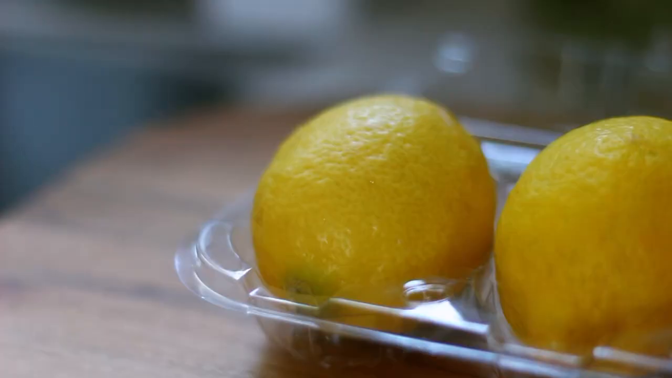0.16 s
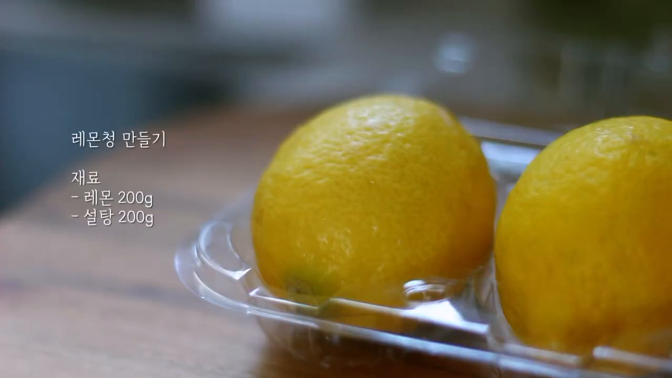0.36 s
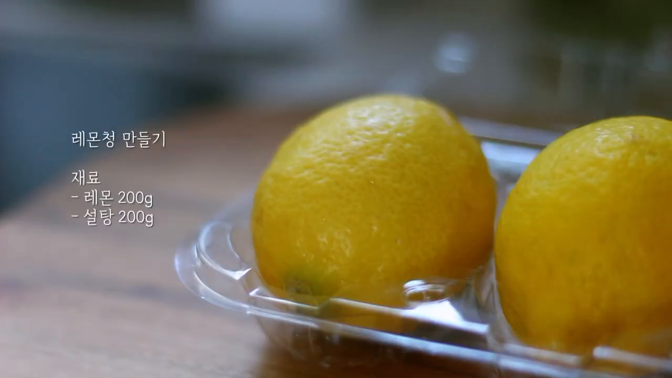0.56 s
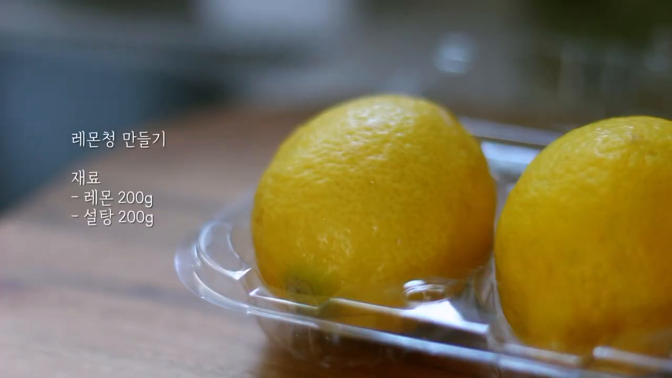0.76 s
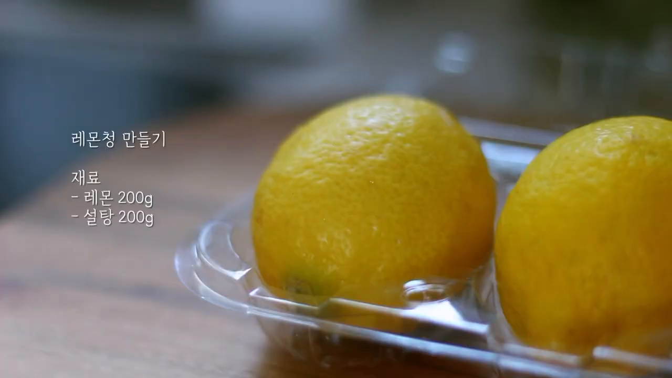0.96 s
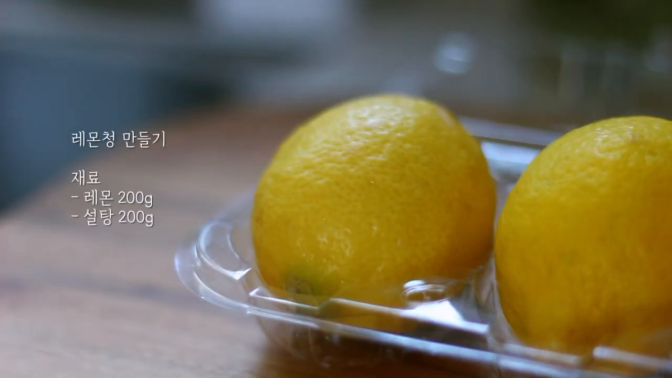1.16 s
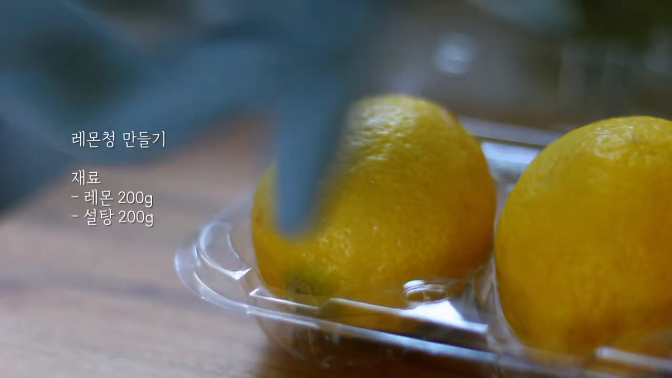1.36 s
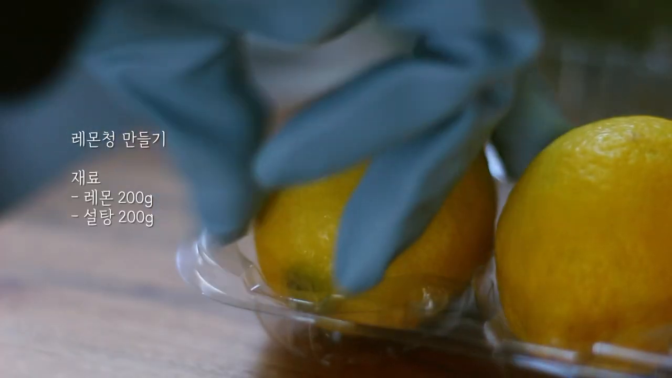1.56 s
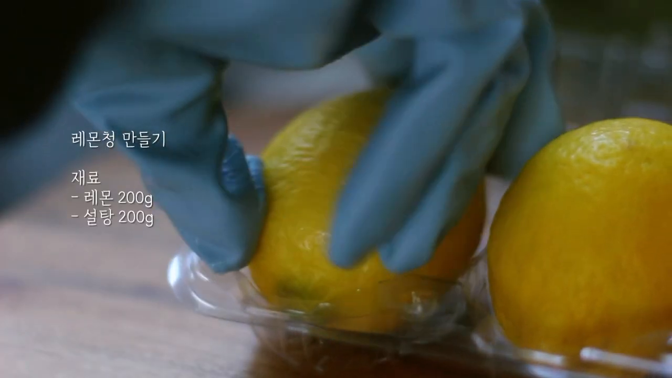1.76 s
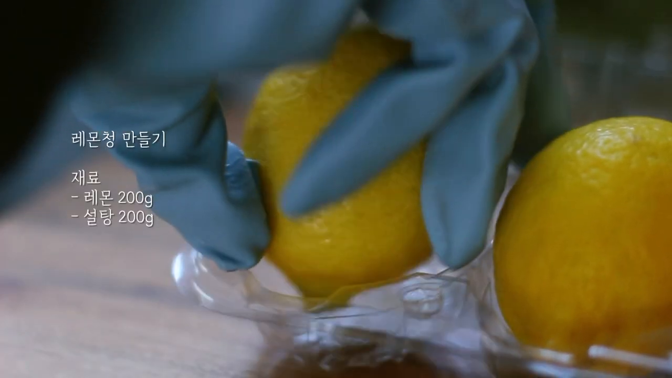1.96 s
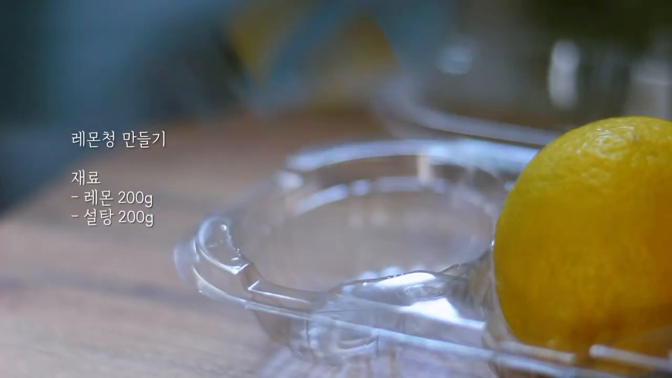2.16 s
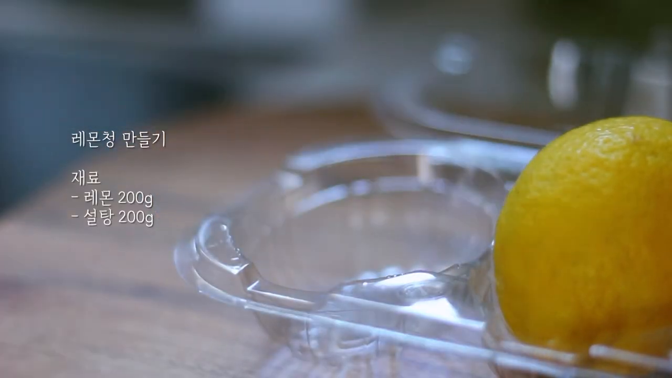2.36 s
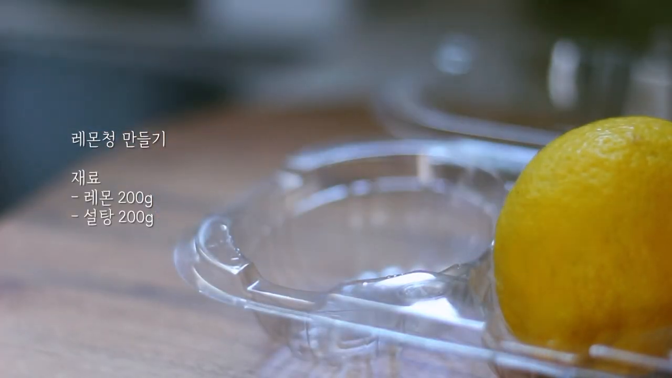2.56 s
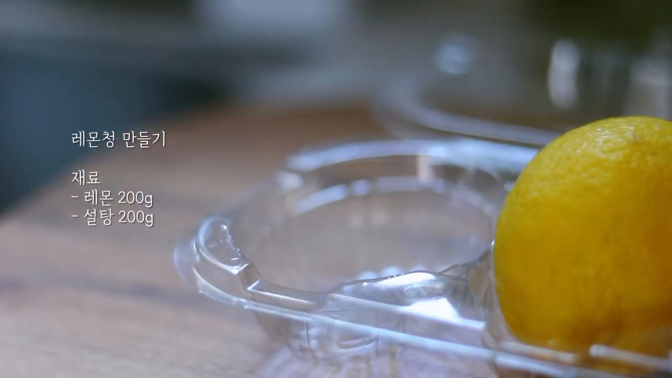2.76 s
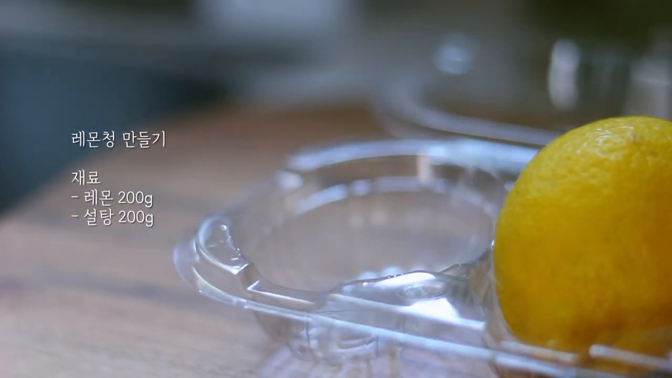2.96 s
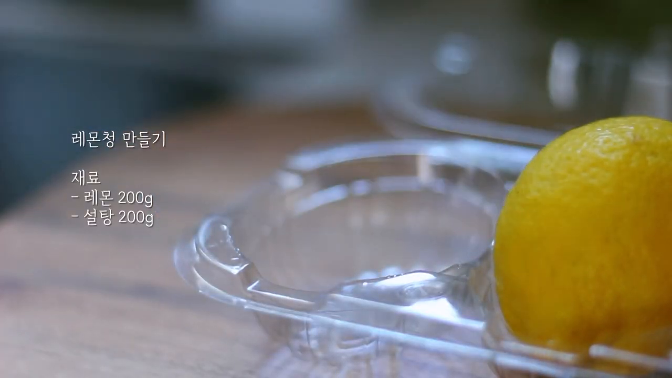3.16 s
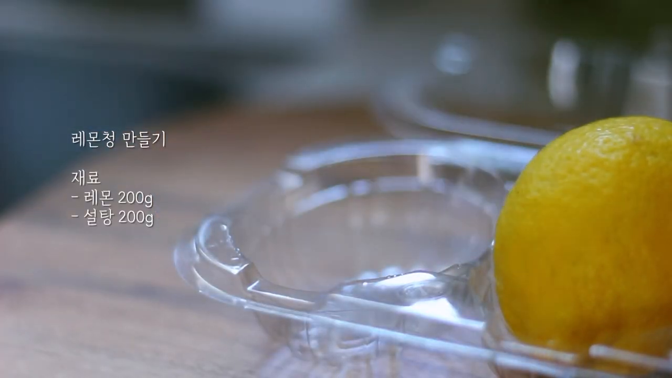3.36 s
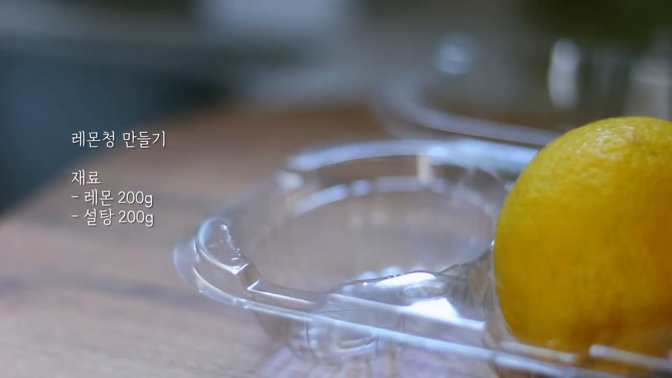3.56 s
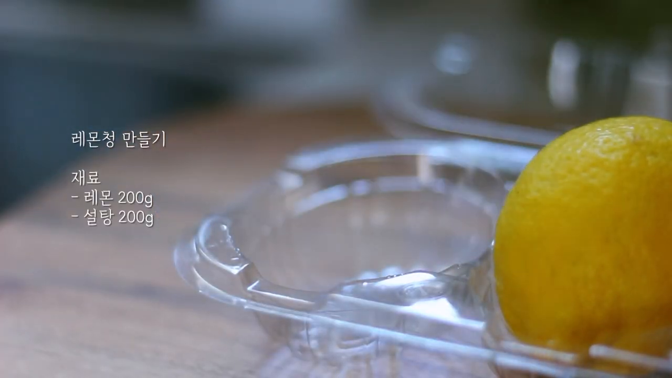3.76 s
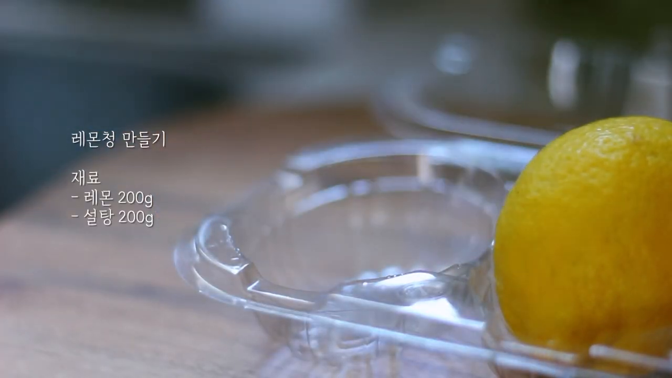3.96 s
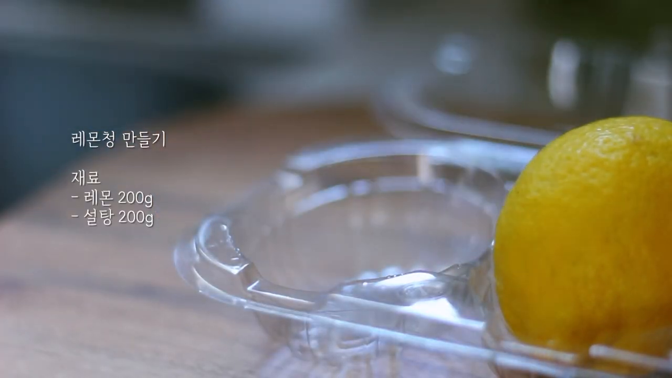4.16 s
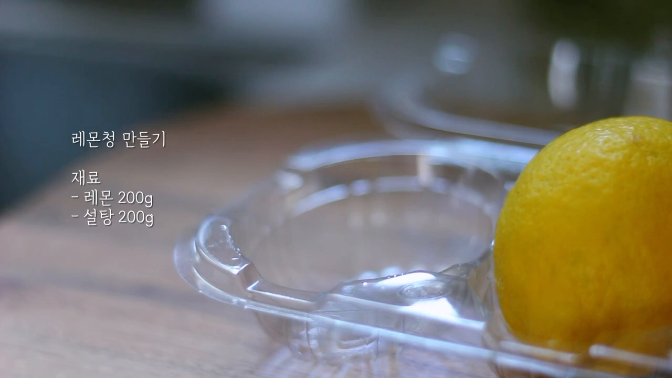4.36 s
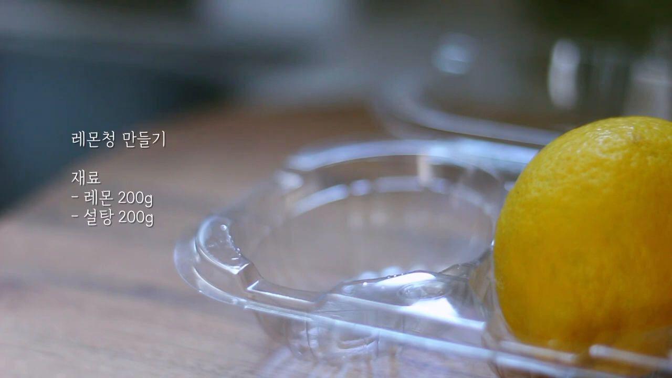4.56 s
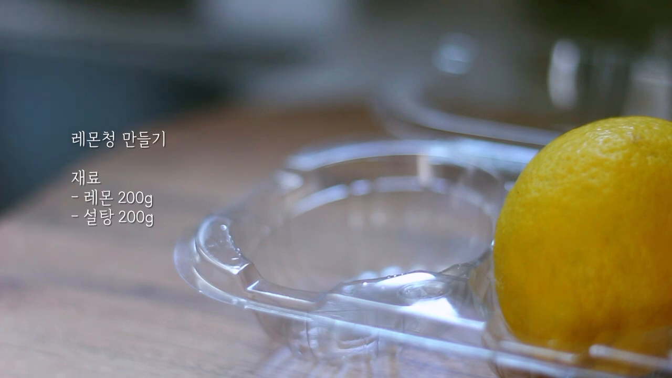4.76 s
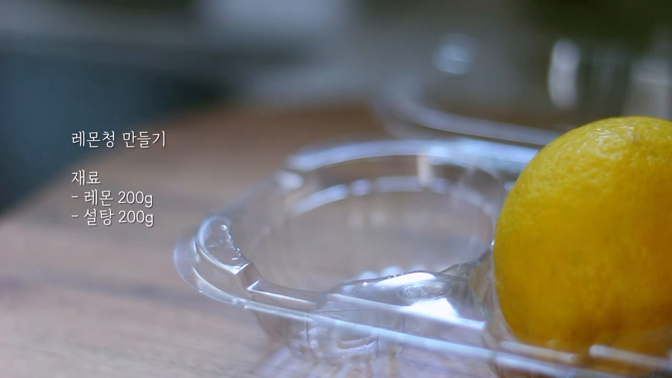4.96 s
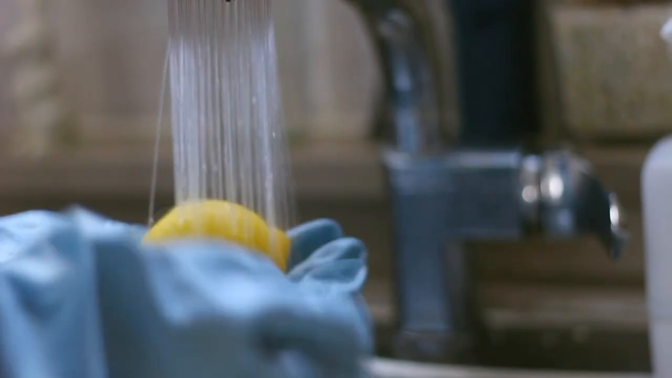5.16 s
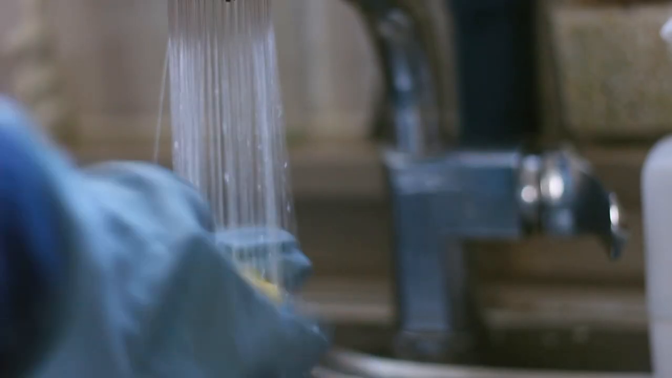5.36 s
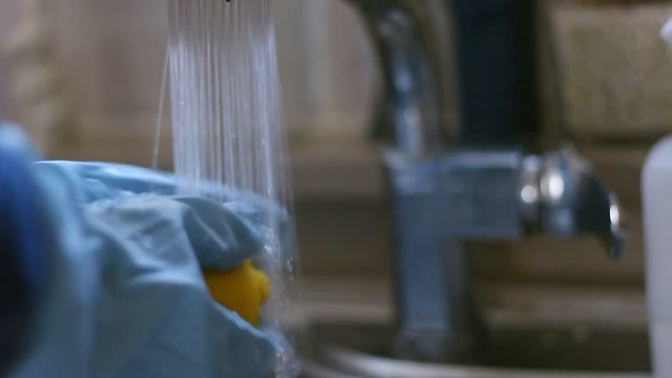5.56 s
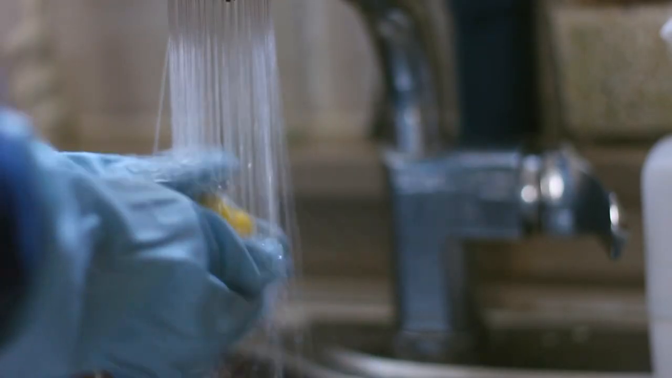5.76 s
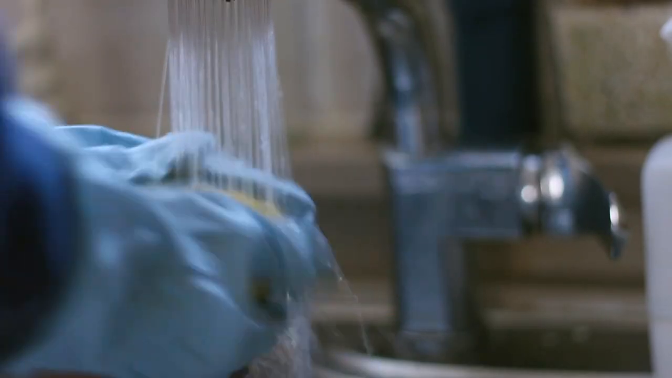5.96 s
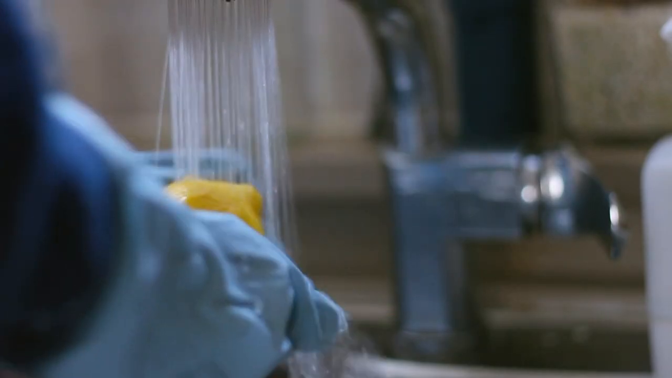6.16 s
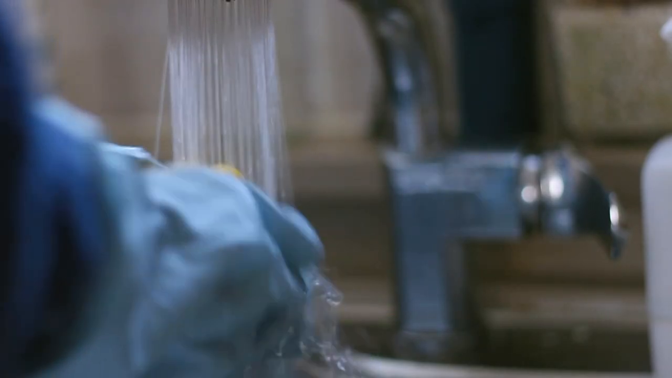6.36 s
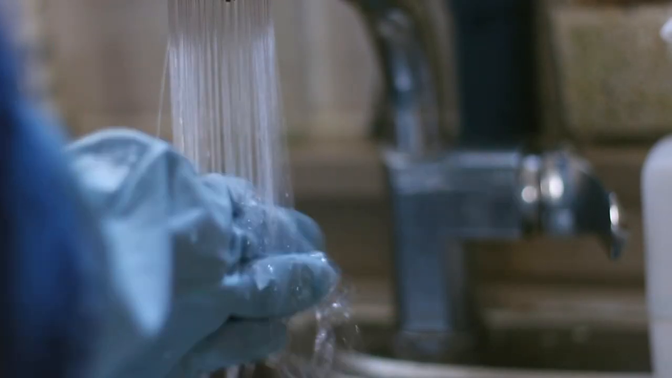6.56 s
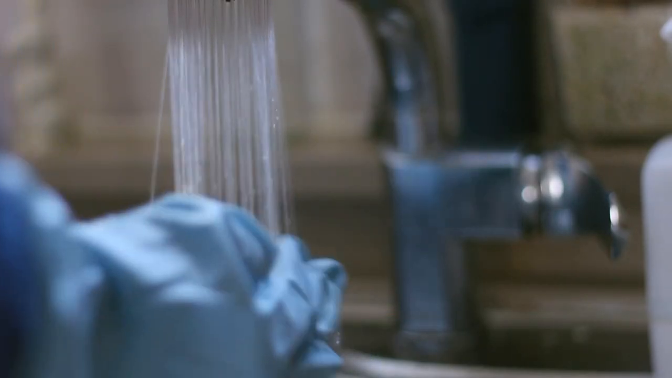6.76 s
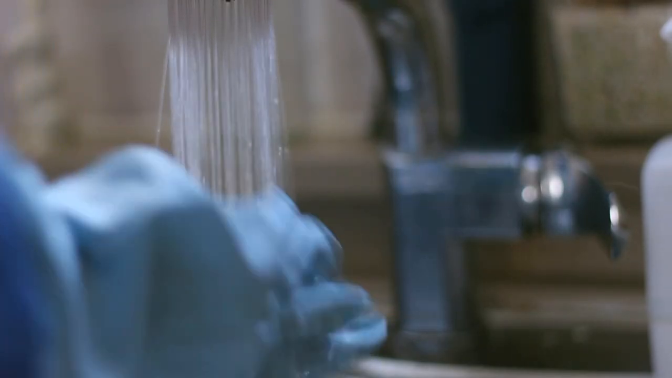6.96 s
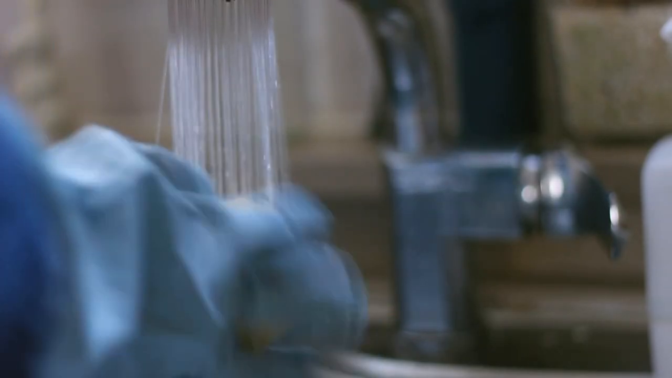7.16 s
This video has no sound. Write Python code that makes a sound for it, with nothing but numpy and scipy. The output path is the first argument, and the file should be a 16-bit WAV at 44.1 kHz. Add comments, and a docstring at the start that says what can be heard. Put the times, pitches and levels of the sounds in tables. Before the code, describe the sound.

Two sharp plastic snaps and soft crinkling, followed by tap water spraying into a sink while gloved hands rub fruit with wet squelches.

```python
"""In a quiet kitchen, a plastic fruit pack snaps open and creases as a gloved hand lifts out a lemon.
A spray tap spurts on: its jets drum on the steel sink, trap ringing bubbles and throw off spray.
Rubber gloves rub the lemon, squeezing out pockets of air with wet squelches. The washing cuts out
for an instant, then goes on with the hands in the stream: less drumming, more gurgling and dripping."""
import sys
import numpy as np
from scipy import signal
from scipy.fft import rfft, irfft
from scipy.io import wavfile

SR = 44100
rng = np.random.default_rng(int(sys.argv[2]) if len(sys.argv) > 2 else 0)


def wrap_up_sound(samples):
    """Save the sound to the file named by the first command line argument, as 16-bit audio."""
    columns = np.atleast_2d(samples).T
    # keep every value between -1 and 1, then stretch to whole-number steps
    tamed = np.clip(columns, -1, 1)
    steps = np.round(tamed * 32767).astype(np.int16)
    wavfile.write(sys.argv[1], SR, steps)


N = 317520
TIME = np.arange(N) / SR
TAP_ON_S, BREAK_START_S, BREAK_END_S = 2.5, 5.031, 5.039

# The tone of thin plastic being handled. Each row: frequency in Hz, level in dB.
PLASTIC_TONE = [(150, -44), (280, -16), (560, -6), (950, -0.5), (3500, -1.5), (4570, -14.5), (5930, -8.5),
                (6940, -16.5), (16000, -41.5)]


def tap():
    """Running water falls past the hands onto the sink and, after the break, onto the hands."""
    # The water's tone past the hands and onto them. Each row: frequency in Hz, level in dB.
    past_tone = [(35, -85), (60, -12.5), (146, 9), (222, 1), (651, 2.5), (903, 0.5), (1410, -4.5),
                 (2770, -9.5), (3580, -5.5), (4640, -18), (6000, -19.5), (8710, -18.5), (16000, -31)]
    onto_tone = [(35, -45), (60, -13), (150, -11), (417, -10), (732, -9.5), (930, -1), (1400, -4.5),
                 (1650, -8), (3500, -8), (4750, -12), (6000, -1.5), (9130, -12), (14900, -12), (16000, -32)]
    # Where the sink rings in each case. Each row: pitch in Hz, width in Hz, boost in dB.
    past_sink = [(450, 110, 4.5), (650, 9.2, 9.5), (777, 50, 5), (5840, 840, 7)]
    onto_sink = [(649, 12.5, 9.9), (3970, 520, 2.9), (9020, 1300, 9.8)]
    past_gains, onto_gains, boom_gain, hiss_gain = flow()
    large = bubbles(per_s=440, spread_db=3.7, cycles=13, low_hz=1150, high_hz=4500)
    fine = bubbles(per_s=190, spread_db=5.5, cycles=55, low_hz=4750, high_hz=10900)
    fizz = rms_one(kitchen(large + 0.5 * fine, wet_db=-0.5, t60=0.05, near_db=-3))
    drops = patter(per_s=1500, spread_db=8)
    past = stream(past_gains, past_tone, past_sink, fizz, drops, bubble_share=0.57)
    onto = stream(onto_gains, onto_tone, onto_sink, fizz, drops, bubble_share=0.7)
    basin = resonance(resonance(rng.standard_normal(N), 916, 115), 916, 115)
    onto += amp(-55.5 + 4.5 * drift(19)) * rms_one(basin)
    # The sink's floor flexes like a drum skin.
    sink_floor = resonance(resonance(rng.standard_normal(N), 156.5, 20), 157, 62)
    boom = boom_gain * rms_one(sink_floor)
    sputter = hiss_gain * rms_one(band(rng.standard_normal(N) + 0.5 * drops, 5900, 10700, order=1))
    rumble = amp(-72.5) * rms_one(band(rng.standard_normal(N), 50, 53))
    rumble *= np.clip(TIME - TAP_ON_S, 0, 1)
    return (np.where(TIME < BREAK_START_S, past + boom + sputter, onto) + rumble) * (TIME > TAP_ON_S)


def flow():
    """How loud each part of the water is as the tap spurts and settles and the hands shield the sink."""
    # How much spray gets past the hands to the bare sink. Each row: time in seconds, change in dB.
    bare_sink = [(2.9, -1.5), (3.28, 1), (3.45, -2), (3.72, 3), (3.9, -4), (4.14, 4), (4.62, -8.5),
                 (4.77, -17), (4.92, -12)]
    # The turning lemon sheds sheets of water.
    # Each row: middle in seconds, half length in seconds, full swell in dB.
    spills = [(4.852, 0.12, 13.5), (4.98, 0.054, 10), (5.42, 0.024, 10.5), (5.79, 0.06, 4.5),
              (6.93, 0.027, 6)]
    # Air is driven out of the spray head. Each row: middle in seconds, half length in seconds,
    # then the levels of drumming, bubbling and hiss in dB.
    air_spurts = [(2.586, 0.029, -55, -48, -64), (2.624, 0.013, -75, -47, -59),
                  (2.696, 0.058, -90, -49, -63), (2.775, 0.011, -44, -54, -40.5),
                  (2.802, 0.038, -51.5, -48.5, -51.5)]
    # Spray breaks through and makes the sink's floor boom.
    # Each row: middle in seconds, half length in seconds, boost in dB.
    floor_hits = [(3.118, 0.035, 15), (3.282, 0.041, 13), (3.358, 0.047, 14), (3.73, 0.043, 8)]
    # Each group of three is for drumming, bubbling and spray.
    past_db, onto_db = (-49.5, -48, -52.5), (-50, -43, -54)
    sink_shares, spill_shares = (0.72, 0.5, 0.18), (0.81, 0.69, 0.69)
    running_s = np.maximum(TIME - TAP_ON_S, 0)
    opening_db = -16 * np.exp(-running_s / 0.33)   # the flow builds up
    on_sink_db = np.interp(TIME, *np.transpose(bare_sink))
    spill_db = sum(db * hump(s, half_s) for s, half_s, db in spills)
    swell_db = np.outer(spill_shares, spill_db)
    spurts = sum(np.outer(amp(levels_db), hump(s, half_s)) for s, half_s, *levels_db in air_spurts)
    past = amp(past_db)[:, None] * amp(opening_db + np.outer(sink_shares, on_sink_db) + swell_db)
    past[:2] = np.hypot(past[:2], spurts[:2])
    onto = amp(onto_db)[:, None] * amp(swell_db)
    surge_db = sum(db * hump(s, half_s) for s, half_s, db in floor_hits)
    damping_db = 7 * running_s   # water pooling on the sink's floor quiets its boom
    boom = amp(-53 + opening_db + on_sink_db + surge_db + spill_db - damping_db)
    hiss = np.hypot(amp(-67), spurts[2])   # the nozzles also hiss steadily
    return past, onto, boom, hiss


def stream(gains, tone, sink, fizz, drops, bubble_share):
    """Fine jets drum on the steel, trap bubbles and throw off spray; the sink rings along."""
    wash = colour(rng.standard_normal(N) + 0.33 * drops + bubble_share * fizz, tone)
    wash += sum((amp(boost_db) - 1) * resonance(wash, hz, width) for hz, width, boost_db in sink)
    drumming, bubbling, spraying = gains
    wobble = drift(70)   # the stream breaks up unevenly on the moving hands
    drum = drumming * amp(1.6 * drift(40)) * rms_one(band(wash, 35, 900))
    gurgle = bubbling * amp(0.52 * wobble) * rms_one(band(wash, 900, 4500, order=3))
    spray = spraying * amp(2.83 * wobble + drift(82)) * rms_one(band(wash, 4500, 19000, order=3))
    return drum + gurgle + spray


def bubbles(per_s, spread_db, cycles, low_hz, high_hz, count=4000, size=900):
    """Bubbles form at random, each ringing briefly at its own slightly rising pitch."""
    when, pitch, chance, strength, life = rng.random((count, 5)).T[:, :, None]
    hz, t = low_hz * (high_hz / low_hz) ** pitch, TIME[:size]
    formed = chance < per_s * N / SR / count
    height = amp(-spread_db * np.log(np.maximum(strength, .02))) * np.sqrt(hz) * formed
    age = hz * t / (cycles * (.5 + life))
    phase = 2 * np.pi * hz * t * (1 + 0.13 * np.minimum(age, 1))
    rings = height * np.exp(-np.log(1000) * age) * np.sin(phase)
    at = (when * N).astype(int) + np.arange(size)
    return rms_one(np.bincount(at.ravel(), rings.ravel())[:N])


def squelches():
    """Beside the stream the wet gloves smack and spatter; under it they pop more roundly."""
    # Air pockets squeezed out between glove and peel.
    # Each row: start in seconds, level in dB, pitch in Hz, spray adjustment in dB.
    air_pockets = [(3.0988, -25.5, 3060, -11), (3.181, -25, 3170, -39), (3.246, -28.5, 3450, -7.5),
                   (3.297, -33, 7540, -14), (3.3178, -28, 4100, -11), (3.3944, -33, 7950, -13),
                   (3.449, -39.5, 3940, 1.5), (3.48, -31.5, 3350, -19), (3.5481, -36.5, 3780, -3.5),
                   (3.637, -38.5, 5400, -1), (3.712, -43, 3820, 4), (3.7509, -27, 3050, -13),
                   (3.788, -35, 4600, -2.5), (3.834, -24.5, 5200, -8), (3.948, -31.5, 5700, -12.5),
                   (3.9649, -38.5, 6500, 1), (4.056, -36, 3780, -2), (4.0968, -25.5, 3620, -16),
                   (4.122, -34, 4200, -5), (4.2621, -24.5, 3280, -13.5), (4.314, -44, 5470, 1),
                   (4.375, -27, 4140, -9), (4.4297, -23.5, 2440, -19), (4.4394, -20, 3340, -16.5),
                   (4.456, -23.5, 3880, -23), (4.561, -21, 3170, -19), (4.595, -23.5, 3160, -24),
                   (4.623, -32, 4040, -17), (4.653, -26.5, 4600, -11), (4.698, -27, 4500, -12.5),
                   (4.7455, -25.5, 3600, -12), (4.903, -30.5, 2330, -20), (4.9741, -26, 4240, -11),
                   (5.017, -25.5, 3100, -22), (5.072, -31, 3050, -27), (5.106, -26.5, 2030, -21),
                   (5.2708, -28, 3040, -19), (5.286, -31, 4320, -9), (5.307, -27, 3740, -15),
                   (5.407, -25.5, 3180, -12), (5.423, -30.5, 3310, -34), (5.5202, -29.5, 9040, -16),
                   (5.612, -33.5, 3280, -9.5), (5.739, -27, 2730, -7.5), (6.0925, -27, 3720, -23),
                   (6.1993, -25, 2780, -18), (6.275, -26.5, 3580, -12), (6.2977, -21, 2990, -40),
                   (6.318, -36, 3070, 2), (6.3421, -24.5, 3690, -10), (6.511, -33.5, 4600, -2),
                   (6.591, -37.5, 2480, 2.5), (6.6924, -28, 5770, -12), (6.775, -23.5, 2926, -27),
                   (6.832, -31.5, 3790, -9), (6.877, -34.5, 3220, -1), (6.948, -24, 3390, -19),
                   (6.9967, -21.5, 2440, -36), (7.163, -29, 3330, -34), (7.194, -29, 3560, -17)]
    out = np.zeros(N)
    for s, db, hz, spray_db in air_pockets:
        if s < BREAK_START_S:
            sound = squelch(hz, spray_db, pop_db=-7, pop_t60=0.006, slap_octaves=0.67, t60=0.098)
        else:
            sound = squelch(hz, spray_db, pop_db=-3.5, pop_t60=0.012, slap_octaves=0.4, t60=0.047)
        add(out, s, amp(db) * sound)
    return out


def squelch(hz, spray_db, pop_db, pop_t60, slap_octaves, t60):
    """Wet rubber slaps, an air pocket pops, froth crackles around the same pitch, and droplets fly."""
    low_hz, high_hz = hz / 2 ** (slap_octaves / 2), hz * 2 ** (slap_octaves / 2)
    slap = peak_one(band(burst(0.021) * (1 - dying(0.0046)), low_hz, high_hz, order=3))
    pop = peak_one(ring(hz, pop_t60, rise=0.069) * (1 - dying(0.0098)))
    froth = peak_one(band(crackle(t60), low_hz, high_hz))
    return 0.65 * slap + amp(pop_db) * pop + 0.58 * froth + amp(spray_db + 8.5) * droplets(t60)


def snaps():
    """A stud scrapes out of its socket, both ring and kick the shell; the rim slaps back and buzzes."""
    # The pack's press studs let go. Each row: start in seconds, crack and shell levels in dB,
    # the stud's pitch in Hz, level in dB and ring time in seconds, the socket's pitch in Hz and
    # level in dB, the rim's pitch in Hz and level in dB, wait before the slap in seconds.
    studs = [(0.3686, -5.5, -8.5, 14130, -3.5, 0.0066, 6740, -18.5, 2260, -26, 0.0008),
             (0.4973, -5, -19, 13140, -8, 0.0061, 8230, -20, 3050, -18.5, 0.0021)]
    # The notes of the thin shell. Each row: pitch in Hz, level in dB, ring time in seconds.
    shell_notes = [(470, -17, 0.007), (765, -8, 0.02), (830, -8, 0.028), (1310, -16, 0.014),
                   (2230, -11, 0.02), (2950, -11, 0.017), (3620, -14.5, 0.017), (4320, -9, 0.015),
                   (4960, -18, 0.014), (5865, -5.5, 0.014), (6950, -8, 0.028), (7590, -6, .012),
                   (9550, -5, 0.008)]
    # The tone of the crack. Each row: frequency in Hz, level in dB.
    crack_tone = [(200, -20), (500, -13), (1500, -17), (3000, -11), (5200, -15), (6800, -2), (10500, -5),
                  (12800, 3), (14300, -4), (16000, -25)]
    out = np.zeros(N)
    for (s, crack_db, shell_db, stud_hz, stud_db, stud_t60,
         socket_hz, socket_db, rim_hz, rim_db, wait_s) in studs:
        # Neighbouring notes swing in opposite directions.
        shell = sum((-1) ** k * amp(db) * ring(hz, t60) for k, (hz, db, t60) in enumerate(shell_notes))
        stud = peak_one(ring(stud_hz, stud_t60) * (1 - dying(0.0056)))
        crack = peak_one(colour(burst(0.0082), crack_tone))
        chatter = burst(0.18)   # the loose lid keeps stud and socket buzzing
        shrill = resonance(chatter, stud_hz, 1200) + resonance(chatter, socket_hz, 1700)
        lid = resonance(chatter, 840, 130)
        buzz = peak_one(band(shrill, 6000, 22000) + 1.2 * lid)
        slap = peak_one(colour(burst(0.0079), crack_tone))
        add(out, s, amp(shell_db) * shell + amp(stud_db) * stud + amp(socket_db) * ring(socket_hz, 0.017))
        add(out, s, amp(crack_db) * crack + amp(rim_db) * ring(rim_hz, 0.013) + amp(-26) * buzz)
        add(out, s + wait_s, amp(-13) * slap + amp(-20) * band(shell, 3600, 5500))
    return band(out, 220, 22000, order=1)   # so small a shell gives off little bass


def gulps():
    """Larger pockets of water and air give low, bubbling plops."""
    # Water slops out of the cupped hands.
    # Each row: start in seconds, level in dB, pitch in Hz, the slop's fade time in seconds.
    slops = [(5.095, -40, 524, 0.06), (5.209, -36, 940, 0.025), (5.359, -28, 1240, 0.019),
             (6.212, -28.5, 674, 0.099), (6.215, -39, 317, 0.06), (6.341, -41.5, 278, 0.092),
             (6.431, -31.5, 924, 0.035), (6.453, -25.5, 1350, 0.015), (6.611, -38.5, 262, 0.22),
             (6.778, -27.5, 1360, 0.02), (6.884, -31, 1230, 0.038), (6.941, -30, 1450, 0.023),
             (6.993, -31, 860, 0.045), (7.104, -37, 910, 0.045), (7.131, -30, 1280, 0.11)]
    out = np.zeros(N)
    for s, db, hz, t60 in slops:
        slop = peak_one(resonance(resonance(crackle(t60), hz, hz * 0.5), hz, hz * 0.74))
        add(out, s, amp(db) * (1.18 * slop + 0.3 * ring(hz, t60 * 1.3, rise=0.05)))
    return out


def creases():
    """The thin plastic buckles: hard creases are nearly all tick, soft ones mostly rasp."""
    # Fingers dent the pack. Each row: start in seconds, level in dB, pitch in Hz, added treble in dB.
    dents = [(0.137, -45, 1640, -9), (0.608, -41, 1260, -23), (0.663, -41.5, 1390, 2),
             (0.891, -47.5, 1420, 5.5), (1.298, -44.5, 1610, -25.5), (1.512, -35.5, 2320, -10),
             (1.5264, -27.5, 2420, -6.5), (1.538, -37.5, 2190, -20), (1.678, -39.5, 1510, -20),
             (1.7131, -26, 2410, -14.5), (1.788, -34, 2750, 0.5), (1.8462, -27, 1770, -30),
             (1.916, -34.5, 1660, -8), (1.974, -35, 2330, -19), (2.084, -38.5, 2050, -9),
             (2.234, -43, 1985, -33), (2.398, -41.5, 3800, -23.5), (2.424, -40.5, 3750, -35),
             (2.491, -32.5, 2800, -3.5)]
    out = np.zeros(N)
    for s, db, hz, treble_db in dents:
        tick = peak_one(colour(ring(hz, 0.0037), PLASTIC_TONE))
        rasp = peak_one(colour(resonance(crackle(0.02), hz, 2100), PLASTIC_TONE))
        edge = peak_one(band(burst(0.0073), 2260, 6200))
        add(out, s, amp(db) * (tick + amp(treble_db) * edge) + amp(db / 2 - 23) * rasp)
    return out


def spatter():
    """The rubbing fingers flick off droplets."""
    # Small showers. Each row: start in seconds, level in dB.
    showers = [(3.052, -38.5), (3.079, -32), (3.358, -33.5), (3.372, -34), (3.618, -40), (3.696, -36),
               (3.934, -32), (4.403, -30.5)]
    out = np.zeros(N)
    for s, db in showers:
        add(out, s, amp(db) * droplets(t60=0.045))
    return out


def droplets(t60, count=11):
    """Flung water: a short hiss and a scatter of tiny bubbles that thins out with it."""
    # The tone of the splash. Each row: frequency in Hz, level in dB.
    splash_tone = [(1000, 7), (3500, 12), (4900, 1), (6100, 11), (7500, 1.5), (9000, 7), (11000, 2),
                   (16000, -12)]
    out = 0.75 * crackle(t60)
    for wait, pitch, size in rng.random((count, 3)):
        bubble = ring(5000 * 2 ** pitch, 0.013)
        add(out, wait * wait * t60 / 2, 0.63 * size * (1 - 0.79 * wait) * bubble)
    return peak_one(colour(out * (1 - dying(0.0018)), splash_tone))


def plinks():
    """Each drip into standing water traps one bubble that rings and rises in pitch."""
    # Drips off the hands. Each row: start in seconds, level in dB, bubble pitch in Hz.
    drips = [(5.088, -45, 1525), (5.159, -38, 2100), (5.539, -38, 2270), (5.599, -36, 1350),
             (5.694, -37, 3770), (5.955, -37.5, 1310), (6.007, -36, 2070), (6.634, -34, 3400),
             (6.733, -36, 2400), (7.048, -34.5, 1360)]
    out = np.zeros(N)
    for s, db, hz in drips:
        add(out, s, amp(db) * ring(hz, t60=0.032, rise=0.035))
    return out


def rustle():
    """Rubber slides over plastic, swelling and fading as a fine hiss with small crinkles."""
    # Strokes of the gloves. Each row: firmest moment in seconds, level in dB, swell and fade in seconds.
    strokes = [(0.03, -54, 0.016, 0.031), (0.265, -55, 0.12, 0.023), (0.553, -51.5, 0.15, 0.015),
               (0.68, -54.5, 0.084, 0.044), (1.0, -64.5, 0.18, 0.09), (1.425, -54, 0.0064, 0.018),
               (1.528, -42.5, 0.0066, 0.014), (1.59, -54.5, 0.022, 0.026), (1.76, -50, 0.056, 0.042),
               (1.98, -54, 0.083, 0.035), (2.09, -56, 0.033, 0.018)]
    power = sum(amp(db) ** 2 * np.exp(-2 * np.maximum((s - TIME) / swell_s, (TIME - s) / fade_s))
                for s, db, swell_s, fade_s in strokes)
    friction = rng.standard_normal(N) + 0.8 * patter(per_s=600, spread_db=4.3)
    return np.sqrt(power) * amp(2 * drift(90)) * rms_one(colour(friction, PLASTIC_TONE))


def bumps():
    """The pack knocks softly on the table as it springs open."""
    # Dull knocks. Each row: start in seconds, level in dB, pitch in Hz, ring time in seconds.
    knocks = [(0.499, -45.5, 44.5, 0.092), (0.553, -53, 287, 0.09)]
    out = np.zeros(N)
    for s, db, hz, t60 in knocks:
        add(out, s, amp(db) * ring(hz, t60))
    return out


def kitchen(x, wet_db, t60, near_db):
    """Adds quick echoes from sink and worktop (near_db) and the room's fading echo (wet_db)."""
    # The tone of the echoes. Each row: frequency in Hz, level in dB.
    wall_tone = [(100, -0.5), (800, 0.5), (3500, 2.5), (4900, 1.5), (8000, 3), (10500, -15.5), (13500, -4),
                 (16000, -16)]
    near, tail = burst(0.032), burst(t60)
    onset = 1 - dying(0.02)   # echoes take a few milliseconds to build up
    echoes = amp(near_db) * near / np.linalg.norm(near) + amp(wet_db) * tail / np.linalg.norm(tail)
    return x + signal.oaconvolve(x, colour(onset * echoes, wall_tone))[:N]


def room_noise():
    """The room's own faint, steady noise."""
    # The tone of the quiet room. Each row: frequency in Hz, level in dB.
    room_tone = [(15, -35), (25, 0), (270, -8.5), (354, -2), (470, -10.5), (796, -12), (1890, -9),
                 (4870, -18.5), (16000, -22)]
    return amp(-65.5) * rms_one(colour(rng.standard_normal(N), room_tone))


def crackle(t60, bursts_per_s=420, burst_t60=0.005):
    """A dying run of tiny sharp bursts, the first one the strongest."""
    hiss = burst(t60)
    kicks = (rng.random(len(hiss)) < bursts_per_s / SR) * rng.uniform(0.78, 1, len(hiss))
    kicks[0] = 1
    power = signal.lfilter([1], [1, -amp(-60 / burst_t60 / SR) ** 2], kicks ** 2 + 1e-18)
    return hiss * np.sqrt(power)


def patter(per_s, spread_db):
    """Random tiny hits, a few much stronger than the rest."""
    sizes = amp(spread_db * np.minimum(rng.exponential(1, N), 4)) * rng.choice([-1, 1], N)
    return rms_one(sizes * (rng.random(N) < per_s / SR))


def ring(hz, t60, rise=0):
    """A fading note; for a bubble, the pitch climbs by the fraction rise."""
    fade = dying(t60)
    return fade * np.sin(2 * np.pi * np.cumsum(hz * (1 + rise * (1 - fade))) / SR)


def burst(t60):
    """Noise that dies away."""
    fade = dying(t60)
    return fade * rng.standard_normal(len(fade))


def dying(t60, size=13000):
    """A fade that falls 60 dB in t60 seconds."""
    return np.exp(-np.log(1000) * TIME[:size] / max(t60, 1e-4))


def hump(s, half_s):
    """A smooth swell of height 1 centred on s seconds."""
    return np.exp(-np.minimum(((TIME - s) / half_s) ** 2, 50))


def drift(rate):
    """A random wander of typical size 1 that turns about rate times a second."""
    knots = rng.standard_normal(4096)
    return rms_one(np.interp(TIME * rate, np.arange(len(knots)), knots))


def colour(x, tone, size=4096):
    """Shapes a sound to follow a table of frequencies in Hz and levels in dB."""
    hz, db = np.transpose(tone)
    grid = np.maximum(np.arange(size // 2 + 1) * SR / size, 1)
    cepstrum = irfft(np.log(amp(np.interp(np.log(grid), np.log(hz), db))))
    # Folding onto the first half makes the filter ring only after a hit, never before.
    cepstrum[1:size // 2] *= 2
    cepstrum[size // 2 + 1:] = 0
    return signal.oaconvolve(x, irfft(np.exp(rfft(cepstrum))))[:len(x)]


def band(x, low_hz, high_hz, order=2):
    """Keeps what lies between two frequencies."""
    edges = [low_hz, min(high_hz, SR / 2 - 1)]
    return signal.sosfilt(signal.butter(order, edges, "band", fs=SR, output="sos"), x)


def resonance(x, hz, width_hz):
    """Lets through what is near one pitch, so that it rings."""
    r = np.exp(-np.pi * width_hz / SR)
    feedback = [1, -2 * r * np.cos(2 * np.pi * hz / SR), r * r]
    return signal.lfilter(np.array([1, 0, -1]) * (1 - r * r) / 2, feedback, x)


def add(track, s, sound):
    """Mixes a sound into a track at s seconds."""
    start = max(round(s * SR), 0)
    track[start:start + len(sound)] += sound[:len(track) - start]


def amp(db):
    """Turns decibels into a gain."""
    return 10 ** (np.asarray(db) / 20)


def rms_one(x):
    """Scales to an average (rms) level of 1."""
    return x / np.sqrt(np.mean(x ** 2) + 1e-20)


def peak_one(x):
    """Scales to a peak of 1."""
    return x / (np.abs(x).max() + 1e-20)


def scene():
    """The pack close by, the washing in the sink, and the quiet room behind them."""
    pack = kitchen(snaps(), wet_db=-29, t60=0.3, near_db=-27)
    pack += kitchen(creases(), wet_db=-7, t60=0.24, near_db=-2.5) + rustle() + bumps()
    washing = tap()
    washing += kitchen(squelches() + gulps() + spatter() + plinks(), wet_db=-8.5, t60=0.27, near_db=-3)
    playing = (TIME < BREAK_START_S) | (TIME > BREAK_END_S)   # the water drops out for an instant
    return (pack + washing * playing + room_noise())[None]


def record(dry):
    """Clips peaks at full scale and cuts the treble above 16000 Hz."""
    treble_cut = signal.ellip(10, .1, 80, 16000, fs=SR, output="sos")
    return signal.sosfilt(treble_cut, np.clip(dry, -1, 1))


dry = scene()
out = record(dry)
wrap_up_sound(out)
```